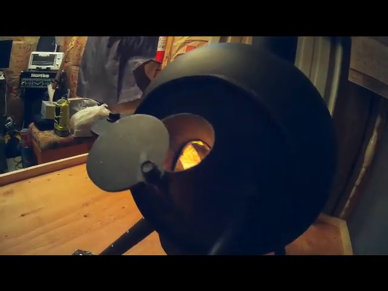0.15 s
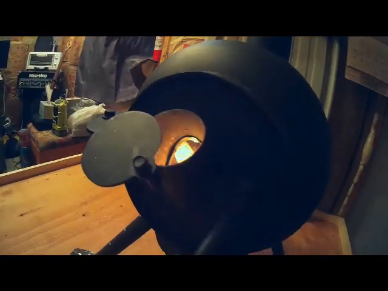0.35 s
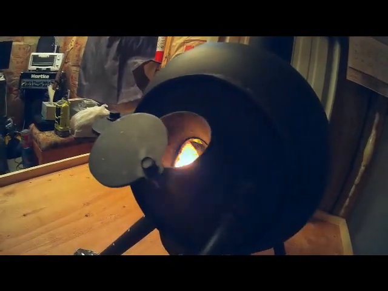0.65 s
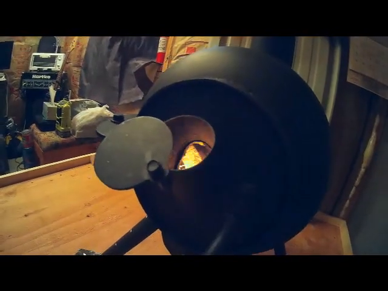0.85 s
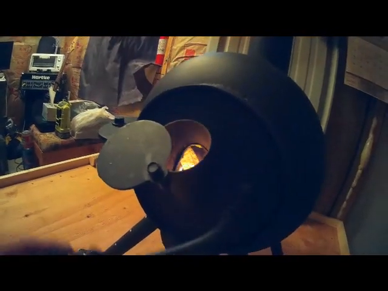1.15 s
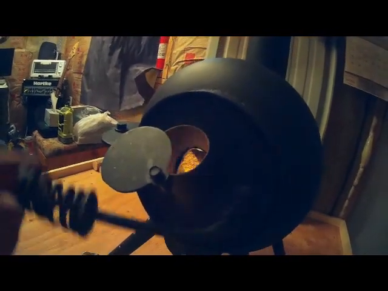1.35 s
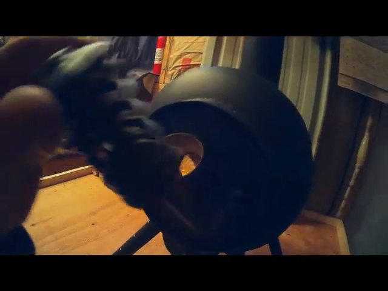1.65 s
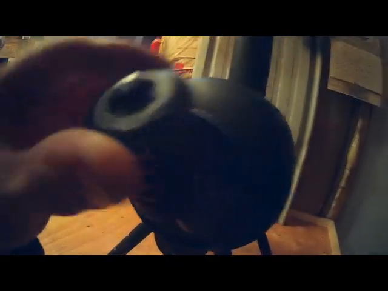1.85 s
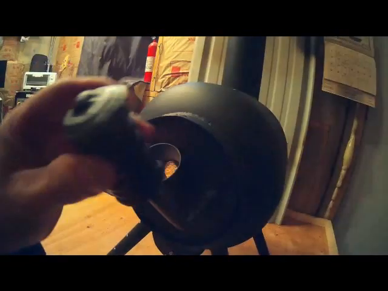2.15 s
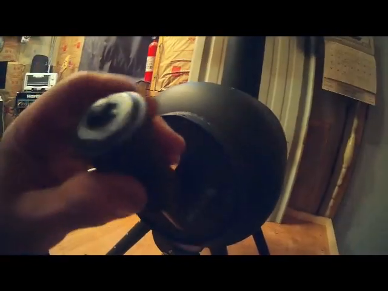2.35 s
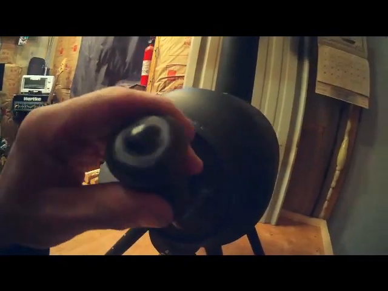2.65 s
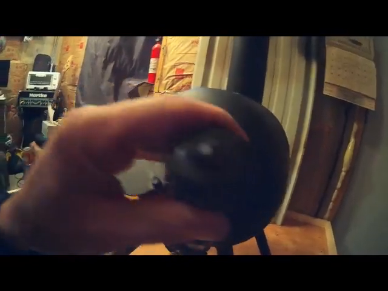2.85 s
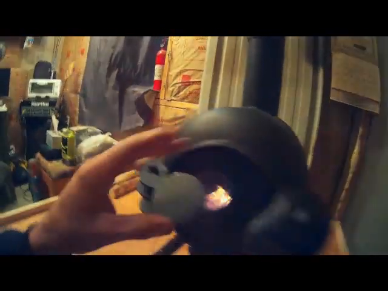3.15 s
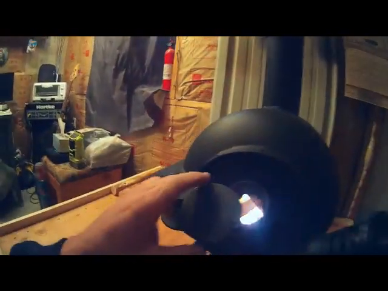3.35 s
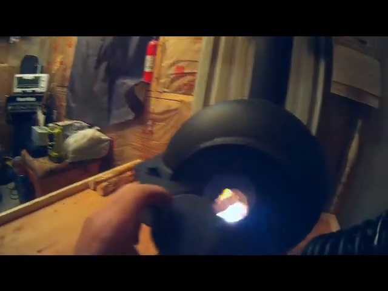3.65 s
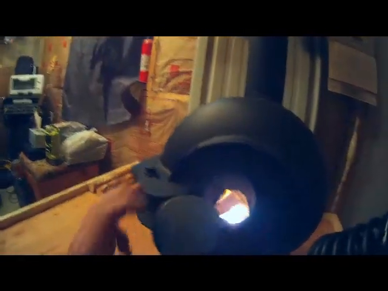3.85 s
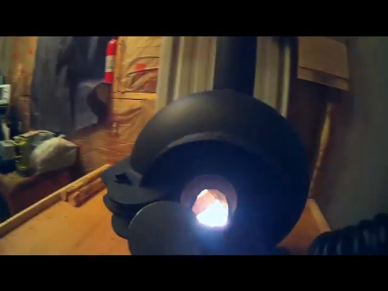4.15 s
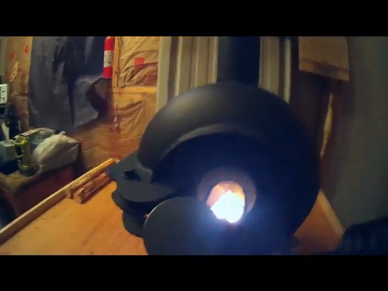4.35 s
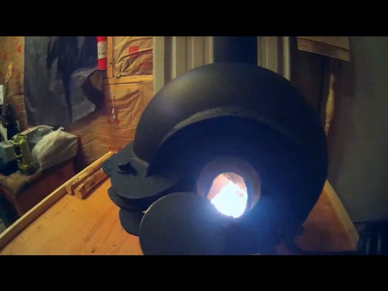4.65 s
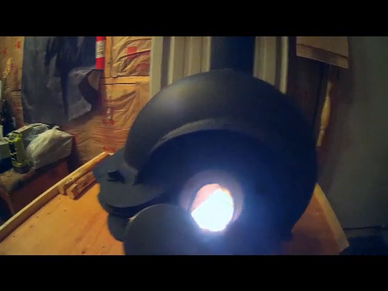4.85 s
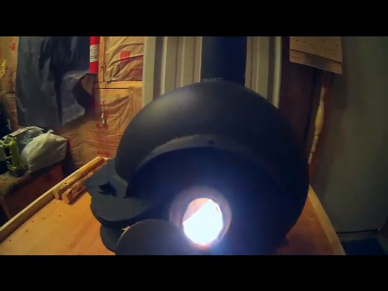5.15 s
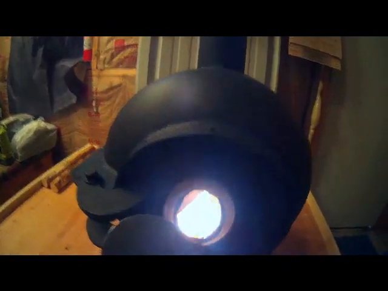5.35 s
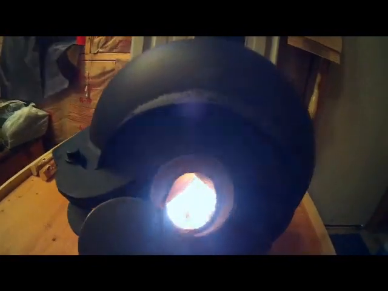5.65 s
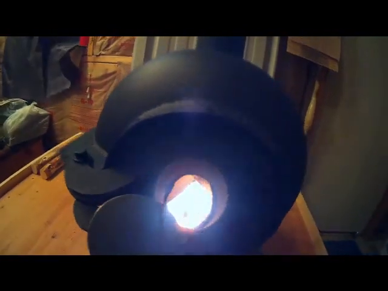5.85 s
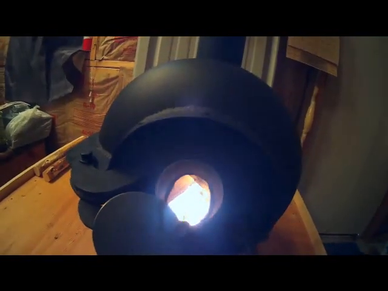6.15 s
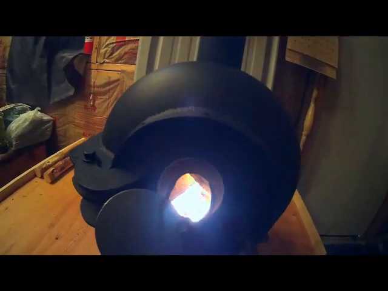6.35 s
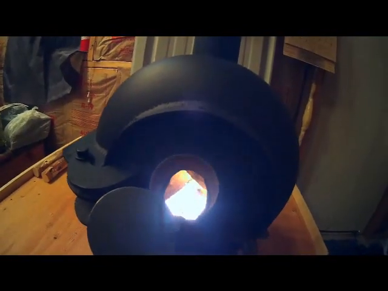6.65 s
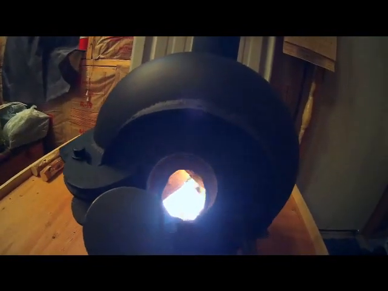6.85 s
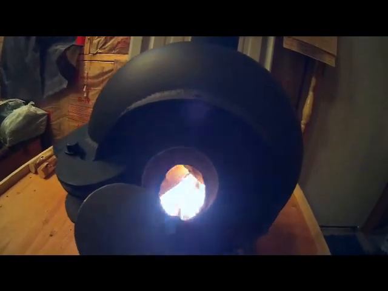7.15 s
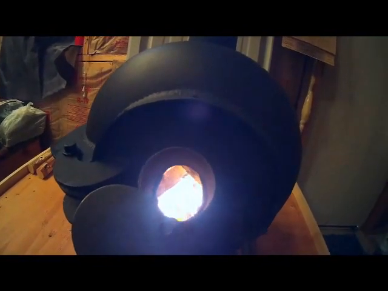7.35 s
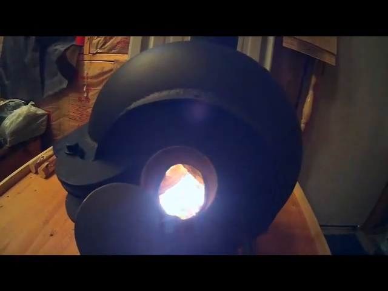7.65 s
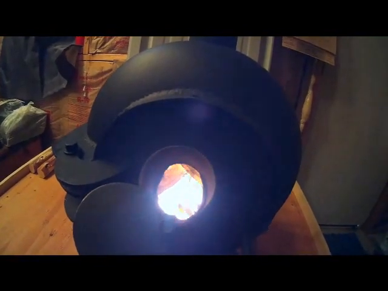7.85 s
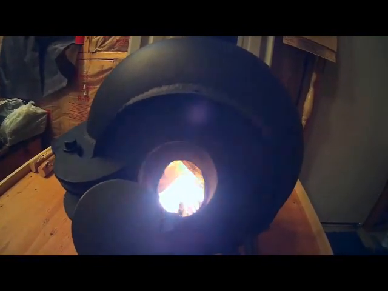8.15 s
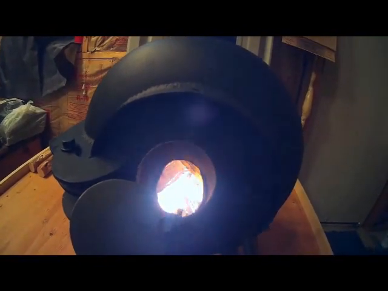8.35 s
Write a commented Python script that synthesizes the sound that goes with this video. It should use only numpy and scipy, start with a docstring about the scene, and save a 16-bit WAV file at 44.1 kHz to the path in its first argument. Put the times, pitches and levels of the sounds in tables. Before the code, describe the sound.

Rapid, low chuffing of flames in an open stove, with close metal knocks and scrapes, then sharp snaps from the embers.

```python
"""A fast, throbbing roar from a wood fire in a small round steel stove with its door open: about eleven
times a second the flame catches, thumps in the firebox and roars in the feed tube. Embers crackle.
Close by, a hand moves a coiled metal tool that clinks, knocks, squeaks, creaks and scrapes.
Halfway through, the one microphone swings round to face the opening. The room hisses faintly behind."""
import sys
import numpy as np
from scipy import signal
from scipy.fft import rfft, irfft
from scipy.io import wavfile
from scipy.ndimage import uniform_filter1d

SR = 44100
rng = np.random.default_rng(int(sys.argv[2]) if len(sys.argv) > 2 else 0)


def int16_out(signal):
    """Quantize to a 16-bit WAV file."""
    q = np.round(np.clip(np.atleast_2d(signal).T, -1, 1) * 32767)
    wavfile.write(sys.argv[1], SR, q.astype(np.int16))


N = 374409

# puffs of flame: (time [s], roar [dB], thump [dB], thump pitch [Hz], thump delay [s])
PUFFS = [(0.034, -38.5, -29, 135, -0.021), (0.074, -42, -33, 132, -0.021), (0.134, -46.5, -31, 109, 0.0081),
         (0.218, -41, -32.5, 131, 0.0042), (0.281, -41.5, -34, 125, 0.0038),
         (0.354, -41.5, -30.5, 110, -0.0011), (0.425, -42.5, -30.5, 98, 0.0011),
         (0.491, -45.0, -29.5, 97, 0.01), (0.566, -45, -33.0, 98, 0.0019), (0.64, -46.5, -35.5, 111, 0.011),
         (0.719, -42.5, -33.5, 106, 0.004), (0.796, -43, -32, 124, 0.00073),
         (0.875, -44.5, -35.5, 128, 0.0069), (0.943, -43.5, -30, 126, 0.006),
         (1.015, -43.0, -34.5, 115, 0.006), (1.091, -43.5, -40, 137, 0.018), (1.169, -45, -36, 106, 0.0099),
         (1.245, -46, -37.5, 99, 0.0094), (1.321, -49, -34.0, 103, 0.0026), (1.407, -47, -30, 106, -0.0061),
         (1.459, -45.0, -33.0, 97, 0.013), (1.543, -49, -37.5, 120, 0.0066),
         (1.627, -49.5, -38, 122, -0.011), (1.7, -50, -42, 133, -0.0026), (1.78, -54, -43, 118, 0.016),
         (1.877, -51, -43, 119, -0.0099), (1.959, -54.5, -41.5, 97, 0.019), (2.047, -55, -39, 101, 0.007),
         (2.131, -56, -40.5, 103, 0.019), (2.22, -50.0, -42, 93, 0.02), (2.322, -55, -46, 101, 0.022),
         (2.413, -54.5, -43.5, 115, 0.003), (2.51, -54, -41.0, 121, -0.0052), (2.598, -59, -41, 94, 0.018),
         (2.693, -53.5, -39, 97, 0.0095), (2.78, -57.0, -38.5, 96, -0.002), (2.854, -58, -50, 130, -0.0012),
         (2.951, -61.5, -46.5, 98, 0.0095), (3.034, -53.5, -38.5, 110, 0.016),
         (3.13, -51.5, -37.5, 99, 0.019), (3.204, -53, -47, 105, 0.046), (3.298, -58, -50, 126, -0.00017),
         (3.385, -59, -47.5, 93, 0.019), (3.48, -57, -42.5, 100, 0.006), (3.566, -55, -43.5, 110, 0.006),
         (3.662, -59, -43.0, 104, 0.01), (3.757, -54.0, -44, 99, 0.022), (3.858, -57, -39.5, 129, 0.0044),
         (3.957, -46, -43, 127, -0.015), (4.027, -53, -43, 105, 0.008), (4.142, -52, -36, 103, -0.0018),
         (4.201, -57.5, -41.5, 101, 0.022), (4.295, -54.5, -40.5, 94, 0.016),
         (4.386, -56.5, -38.5, 104, 0.023), (4.477, -54, -43, 133, -0.0016),
         (4.579, -53, -38.5, 107, -0.01), (4.648, -49.0, -40, 102, -0.02), (4.752, -51.5, -38, 123, -0.007),
         (4.827, -52.5, -35.0, 108, 0.014), (4.918, -46.0, -35.0, 107, -0.0063),
         (4.998, -51.5, -35.5, 127, 0.017), (5.075, -51, -39.5, 91, 0.035),
         (5.179, -47, -36.5, 100, 0.00078), (5.257, -49.5, -40, 104, 0.021),
         (5.353, -48, -36.5, 97, -0.0027), (5.437, -49.5, -39.5, 125, 0.003),
         (5.527, -53, -43.5, 105, 0.0016), (5.614, -49.5, -31, 95, 0.013), (5.715, -50, -34.0, 109, 0.0056),
         (5.796, -48.0, -35.5, 115, 0.0069), (5.885, -49.5, -41.5, 116, 0.0029),
         (5.971, -50.5, -34.5, 119, 0.003), (6.066, -48.5, -40, 103, 0.0083),
         (6.152, -56.5, -41.5, 108, 0.019), (6.253, -51.5, -38.5, 126, 0.0028),
         (6.336, -51, -37.5, 101, 0.007), (6.437, -51, -44, 120, 0.022), (6.53, -57.5, -41.5, 114, 0.02),
         (6.625, -55.5, -43.5, 113, -0.016), (6.726, -55.5, -49, 91, -0.009),
         (6.827, -56.5, -44.5, 146, 0.0066), (6.939, -54, -38, 97, 0.01), (7.03, -54.0, -38, 95, 0.003),
         (7.135, -51.5, -36.0, 103, -0.004), (7.232, -52.0, -38.5, 122, 0.011),
         (7.334, -51.5, -43, 93, 0.002), (7.431, -54.0, -32, 94, 0.0098), (7.516, -51.5, -42, 110, 0.00085),
         (7.611, -53.5, -41, 91, -0.014), (7.696, -52.5, -36, 96, 0.021),
         (7.809, -52.0, -35.5, 104, 0.0042), (7.905, -52, -38, 100, 0.024), (8.005, -51, -31.5, 98, 0.0036),
         (8.096, -53, -43, 124, 0.0023), (8.191, -54.5, -43.5, 111, 0.013),
         (8.307, -53.5, -30, 103, 0.00071), (8.397, -49.5, -40, 110, 0.00018),
         (8.49, -61, -36, 102, 0.0052)]
# the microphone's swing: (time [s], share facing the opening [0-1])
FACING = [(0, 0.2), (4.4, 0.06), (4.9, 0.61), (8.49, 0.89)]
# the four bands that colour a snap: (low edge [Hz], high edge [Hz])
CRACKLE_BANDS = [(900, 2800), (2800, 6000), (6000, 10000), (10000, 14500)]
TUBE_HZ, TUBE_WIDTH_HZ = 635.8, 44  # the hollow note of the feed tube


def firebox_thumps():
    """Each puff rings the air in the firebox for a few cycles and gives a low push of air."""
    # air modes of the firebox: (frequency [Hz], fall [s], relative level [dB])
    firebox = [(86.6, 0.014, 0.5), (127, .017, -2), (201, 0.011, 1)]
    mode_hz, falls, lift_db = np.transpose(firebox)
    out = np.zeros(N)
    for s, _, db, pitch, delay in PUFFS:
        phase = rng.random()  # all modes are pushed together
        off_pitch_db = 25.5 * np.log2(mode_hz / pitch) ** 2
        sizes = gain_of(lift_db - off_pitch_db + 2.5 * rng.standard_normal(3))
        sizes *= gain_of(db) / np.linalg.norm(sizes)
        detuned_hz = mode_hz * rng.uniform(.9, 1.1, 3)
        for size, hz, fall in zip(sizes, detuned_hz, falls):
            t, shape = swell(rise=.0099, fall=fall)
            add(out, s + delay + t[0], size * shape * np.sin(2 * np.pi * (hz * t + phase)))
        t, shape = swell(rise=.019, fall=.015)
        push = sizes[0] * gain_of(-12.5 - 17 * facing(s))
        add(out, s + delay + t[0], push * shape * np.sin(2 * np.pi * (42 * t + phase)))
    return out


def tube_roar():
    """Each puff sends a gust of turbulence through the feed tube and sounds its hollow note."""
    # gusts as the fire settles and the microphone turns: (time [s], note above roar [dB], rise [s])
    gusts = [(0, 2, 0.0055), (.25, 4.5, 0.0064), (.45, -6, 0.011), (.7, 0.5, 0.0063), (1.6, -4, 0.0093),
             (3, 0, .013), (3.8, -0.5, 0.017), (4.5, -11, 0.016), (5.8, -4, 0.0079), (6.6, -13, 0.01),
             (7.3, -8.5, 0.0092), (8.49, -8, .013)]
    times, notes_db, rises = np.transpose(gusts)
    roar_level, note_level = np.zeros((2, N))
    for s, roar_db, *_ in PUFFS:
        note_db = np.interp(s, times, notes_db) + 3 * rng.standard_normal()
        rise = np.interp(s, times, rises) * np.exp(.22 * rng.standard_normal())
        t, shape = swell(rise, fall=.0092 + .65 * rise)  # slower gusts also die slower
        add(roar_level, s + t[0], gain_of(roar_db) * shape)
        t, shape = swell(.75 * rise, fall=.012)
        add(note_level, s + t[0], gain_of(roar_db + note_db) * shape)
    note = resonate(rng.standard_normal(N), TUBE_HZ, TUBE_WIDTH_HZ)
    note /= uniform_filter1d(abs(note), size=600) ** .19  # a gust holds the note steadier
    eddies = unit_rms(waver(depth_db=2.8, samples=150))
    return roar_level * eddies * turbulence() + note_level * unit_rms(note)


def turbulence():
    """Rushing air, its colour changing as the microphone comes to face the opening."""
    # the roar from the side: (frequency [Hz], relative density [dB])
    from_side = [(250, -2.5), (420, -7), (560, 4), (900, -1), (1150, -5.5), (1350, -4), (1750, -7.5),
                 (1950, -10.5), (2200, -25.5), (3000, -26), (6000, -33)]
    # the roar straight down the tube: (frequency [Hz], relative density [dB])
    head_on = [(250, -15), (420, -5), (600, -4.5), (820, 1.5), (1100, -4.5), (1400, -3.5), (1750, -4.5),
               (2100, -19), (3000, -22.5), (6000, -31.5)]
    share = facing(np.arange(N) / SR)
    return np.sqrt(1 - share) * coloured(from_side) + np.sqrt(share) * coloured(head_on)


def draught():
    """The pull of air under the puffs; it slackens before the flame catches again."""
    # strength of the draught: (time [s], rumble [dB], level of the rushing air [dB])
    levels = [(0, -37.5, -41), (.2, -46, -47), (.5, -45, -58.5), (1.2, -45.5, -55.5), (1.45, -49.5, -48.5),
              (1.9, -50, -57), (2.3, -50, -54.5), (2.8, -52, -57.5), (3.55, -53.5, -58.5),
              (3.9, -48, -53.5), (4.4, -49.5, -55.5), (6, -48.5, -57), (7.3, -49, -56.5),
              (8.49, -48.5, -58.5)]
    # its low rumble: (frequency [Hz], relative density [dB])
    rumble_spectrum = [(15, -57), (25, -35), (45, -4.5), (68, -7), (87, 3.5), (105, -6), (125, -11.5),
                       (155, -6), (190, -9), (205, -13), (260, -17.5), (375, -25), (460, -26)]
    times, rumble_db, rush_db = np.transpose(levels)
    t = np.arange(N) / SR
    puff_count = np.interp(t, [row[0] for row in PUFFS], np.arange(len(PUFFS)))
    surge = np.cos(2 * np.pi * (puff_count - .12))
    note = resonate(rng.standard_normal(N), TUBE_HZ, TUBE_WIDTH_HZ)
    rush = turbulence() + gain_of(-11.5) * note
    rumble = gain_of(np.interp(t, times, rumble_db) + 1.6 * surge) * coloured(rumble_spectrum)
    return rumble + gain_of(np.interp(t, times, rush_db) - 3 + .68 * surge) * rush


def embers():
    """Embers snap behind the open door, with thirty tiny crackles at random among the loud ones."""
    # loud crackles: (time [s], band peak at centre [dB], centre [Hz], loss one octave away [dB])
    crackles = [(.185, -48, 8000, 2), (.941, -55, 2600, 6), (1.0904, -49, 6200, 14), (1.432, -44, 6500, 12),
                (2.4, -54, 4000, 4), (2.9239, -49, 6000, 12), (3.2917, -56, 7500, 6),
                (3.8877, -47.5, 5200, 10), (4.1566, -46, 1800, 5), (4.6317, -36, 5800, 3.5),
                (4.8831, -53, 5000, 1), (5.227, -44.5, 8000, 0.5), (5.412, -41, 6000, 2),
                (5.569, -46, 2000, 5), (5.6571, -52.5, 5500, -1), (5.7525, -33.5, 2570, 6.5),
                (5.7977, -48, 4600, 6), (5.9246, -45.5, 7500, 0), (6.003, -43.5, 3000, 3.5),
                (6.015, -47, 4100, 12), (6.2689, -31, 7000, 1.5), (6.6823, -32, 3500, 2.5),
                (7.3258, -37, 4200, 7), (7.414, -50, 4500, 5), (7.6621, -38, 3900, 2),
                (8.0167, -34, 6200, 3.5), (8.1648, -44.5, 3000, 1), (8.3124, -42, 3200, 7),
                (8.3747, -25.5, 10200, 5.5)]
    out = np.zeros(N)
    band_hz = np.sqrt(np.prod(CRACKLE_BANDS, axis=1))
    for s, db, hz, loss_db in crackles:
        bands_db = db - loss_db * np.log2(band_hz / hz) ** 2 + 1.5 * rng.standard_normal(4)
        add(out, s - .0016, snap(bands_db, t60=.013))
    for when, size, *colour in rng.random((30, 6)):
        add(out, when * N / SR, snap(-70 + 6 * size + 8 * np.array(colour), t60=.01))
    return out


def snap(bands_db, t60):
    """A sharp click and its quick echoes inside the steel, which rings at a random pitch in each band."""
    t = np.arange(-60, 4500) / SR
    echoes = gain_of(-16 - 60 * t / t60) + gain_of(-35.5 - 60 * t / .064)
    burst = (t > 0) * rng.standard_normal(len(t)) * echoes
    burst[60] = 1  # the click, at t = 0
    out = np.zeros(len(t))
    for (low, high), db in zip(CRACKLE_BANDS, bands_db):
        band = signal.sosfilt(signal.butter(3, (low, high), "band", fs=SR, output="sos"), burst)
        band = unit_rms(band) + .2 * resonate(band, rng.uniform(low * 1.2, high * .9), width=1100)
        out += gain_of(db) * band / abs(band).max()
    return out


def coil_clinks():
    """Close to the microphone the coil strikes the steel, rings and bounces."""
    # strikes: (time [s], level [dB])
    clinks = [(.0583, -27.5), (.205, -53), (0.278, -61)]
    # modes of the coil: (frequency [Hz], relative level [dB], t60 [s])
    coil = [(2476, -19, .12), (3905, -1, .035), (5601, -10, .12), (5635, -17, .1), (5710, -20, .08),
            (6180, -13, .06), (7253, -10, .03), (7872, -5, .045), (8680, -20, .05), (9802, -15, .07),
            (11430, -17, .05), (13221, -21, .05), (14680, -25, .05)]
    out = np.zeros(N)
    for s, db in clinks:
        add(out, s, gain_of(db) * ring(coil))
        add(out, s - .001, snap(db + np.array([-6, -10, -4, -10]), t60=.14))
    return out


def knocks():
    """Dull knocks on the steel: a pitched body with the brighter ring of the stove's shell."""
    # blows: (time [s], level [dB], pitch [Hz], relative brightness [dB])
    blows = [(.037, -27, 1440, -34), (.058, -29, 662, -3), (1.541, -46, 650, -37), (2.209, -37, 698, -8),
             (2.212, -42, 420, -30), (2.216, -32.5, 1240, -17), (2.222, -38, 584, -16),
             (2.398, -51, 414, -3), (3.171, -38.5, 652, -20), (3.878, -32, 690, -20),
             (3.927, -36, 724, -16), (3.952, -19.5, 648, -16), (4.196, -38, 686, -24),
             (4.565, -33.5, 673, -14), (4.77, -40.5, 707, -26)]
    # modes of a knock: (multiple of the pitch, relative level [dB], t60 [cycles])
    body_modes = [(1, -0.5, 48), (1.11, -6, 43), (.93, -8, 95), (.74, -11.5, 72), (.6, -14, 30),
                  (1.31, -17, 62)]
    # modes of the shell: (frequency [Hz], relative level [dB], t60 [s])
    shell_modes = [(1120, -2.5, 0.028), (1820, -16.5, 0.06), (2150, -10, 0.024), (3720, -20, 0.024)]
    out, shell, rise_s = np.zeros(N), ring(shell_modes), .00397
    t = np.arange(len(shell)) / SR
    onset = np.sin(np.pi / 2 * np.minimum(t / rise_s, 1)) ** 2
    for s, db, hz, bright_db in blows:
        body = ring([(k * hz, mode_db, cycles / hz) for k, mode_db, cycles in body_modes])
        add(out, s - rise_s / 2, gain_of(db) * onset * (body + gain_of(bright_db + 8.5) * shell))
    return out


def squeak():
    """The tool slips four times in a row, each slip weaker and duller than the last."""
    start_s, slip_s, pitch_hz = 2.318, .0175, 1680
    t = np.arange(0, slip_s, 1 / SR)
    arch = np.sin(np.pi * t / slip_s)
    fundamental, *overtones = (arch ** k * np.sin(2 * np.pi * k * pitch_hz * t) for k in (1, 2, 3))
    out = np.zeros(N)
    for slip in range(4):
        tone = fundamental + gain_of(-18 - 12 * slip) * sum(overtones)
        add(out, start_s + slip * slip_s, gain_of(-40.5 - 1.3 * slip ** 2) * tone)
    return out


def creaks():
    """Thin creaks of the tool: narrow bands of noise, one climbing in pitch up to its peak."""
    # creaks: (peak time [s], level [dB], pitch [Hz], width [Hz], rise [s], fall [s], climb [Hz/s])
    events = [(1.36, -70, 6200, 110, .03, .02, 0), (1.37, -66, 4230, 70, .022, .025, 0),
              (1.452, -46.5, 1520, 210, .03, .04, 4500)]
    out = np.zeros(N)
    for s, db, hz, width, rise, fall, climb in events:
        t, shape = swell(rise, fall)
        creak = resonate(rng.standard_normal(len(t)), hz + climb * np.minimum(t, 0), width)
        add(out, s + t[0], gain_of(db) * shape * creak)
    return out


def scrapes():
    """The tool rubs along: the same gritty noise drives thin high resonances and a broad dull one."""
    # strokes: (peak time [s], thin part [dB], its pitch [Hz], dull part [dB], rise [s], fall [s])
    strokes = [(.061, -62.5, 3970, -49, 0.045, 0.054), (1.43, -66, 4250, -53, .045, 0.037),
               (2.216, -67.5, 3700, -56, 0.0056, 0.017), (2.41, -74, 4000, -52, 0.0068, 0.015),
               (3.141, -76, 4000, -59.5, .015, 0.037), (3.705, -64, 3600, -55.5, .052, .03),
               (5.185, -67, 4320, -52, 0.028, 0.027)]
    # resonances of the thin part: (multiple of the pitch, width [Hz], relative level [dB])
    rub = [(1, 680, 4), (1.27, 710, -3.5), (1.5, 440, -14.5), (1.9, 1300, -9.5), (1.4, 2300, -1)]
    out = np.zeros(N)
    for s, thin_db, hz, dull_db, rise, fall in strokes:
        t, shape = swell(rise, fall)
        grit = rng.standard_normal(len(t))
        thin = sum(gain_of(db) * resonate(grit, k * hz, width) for k, width, db in rub)
        dull = resonate(grit, hz=1290, width=1330)
        add(out, s + t[0], shape * (gain_of(thin_db) * thin + gain_of(dull_db) * dull))
    return out


def room():
    """Room tone: a smooth hiss and two wavering whines, fainter as the microphone faces the opening."""
    # fuzzy tones: (frequency [Hz], width [Hz], level [dB])
    whines = [(2528, 100, -73.5), (8640, 150, -84.5)]
    # the hiss: (frequency [Hz], relative density [dB])
    hiss_spectrum = [(880, -13), (1500, -11), (2270, -6.5), (2510, -7.5), (2860, -10), (3770, -10),
                     (14500, -17.5), (15500, -24), (16000, -34)]
    tones = sum(gain_of(db) * resonate(rng.standard_normal(N), hz, width) for hz, width, db in whines)
    tones *= waver(depth_db=2, samples=1500)
    tones *= gain_of(-1.5 * facing(np.arange(N) / SR))
    hiss = gain_of(-65) * coloured([(200, 0)] + list(hiss_spectrum))
    return signal.oaconvolve(hiss + tones, signal.firwin(1023, cutoff=15600, fs=SR), "same")


def facing(s):
    """How far the microphone faces the opening at s seconds, 0 to 1."""
    return np.interp(s, *np.transpose(FACING))


def gain_of(db):
    return 10 ** (np.asarray(db) / 20)


def unit_rms(x):
    return x / np.sqrt(np.mean(x ** 2) + 1e-20)


def add(mix, s, sound):
    """Mixes a sound in at s seconds; what falls outside is cut."""
    at = round(s * SR)
    sound = sound[max(-at, 0):]
    part = mix[max(at, 0):][:len(sound)]
    part += sound[:len(part)]


def coloured(points):
    """Noise of rms 1 with a spectrum of (frequency [Hz], level [dB]) points."""
    point_hz, db = np.transpose(points)
    hz = np.fft.rfftfreq(N, 1 / SR)
    shape = gain_of(np.interp(np.log(hz + 1), np.log(point_hz + 1), db, left=-90, right=-90))
    return unit_rms(irfft(rfft(rng.standard_normal(N)) * shape, N))


def waver(depth_db, samples):
    """A gain that wanders at random, smoothed twice over so many samples."""
    drift = uniform_filter1d(uniform_filter1d(rng.standard_normal(N), samples), samples)
    return gain_of(depth_db * unit_rms(drift))


def resonate(x, hz, width):
    """A resonance of rms 1: shifts hz (a number or a curve) to zero, smooths twice, and shifts back."""
    turn = np.exp(2j * np.pi * np.cumsum(hz * np.ones(len(x))) / SR)
    pole = np.exp(-np.pi * width / SR)
    smoothed = signal.lfilter([1], np.convolve([1, -pole], [1, -pole]), x / turn)
    return unit_rms((turn * smoothed).real)


def swell(rise, fall):
    """A bell-shaped rise to 1 and an exponential tail; returns times around the peak and the shape."""
    t = np.arange(-3 * rise, 6 * fall, 1 / SR)
    return t, np.where(t < 0, np.exp(-.5 * (t / rise) ** 2), 1 / np.cosh(t / fall))


def ring(modes):
    """Dying sines that all start from rest at the blow."""
    t = np.arange(9000) / SR
    return sum(gain_of(db - 60 * t / t60) * np.sin(2 * np.pi * hz * t) for hz, db, t60 in modes)


def scene():
    """The fire, the tool and the room at one microphone."""
    fire = firebox_thumps() + tube_roar() + draught() + embers()
    tool = coil_clinks() + knocks() + squeak() + creaks() + scrapes()
    return (fire + tool + room())[None]


def record(dry):
    """The recorder cuts off the highest treble."""
    lowpass = signal.firwin(511, cutoff=16550, window=("kaiser", 9), fs=SR)
    return signal.oaconvolve(dry, lowpass[None], "same")


dry = scene()
out = record(dry)
int16_out(out)
```